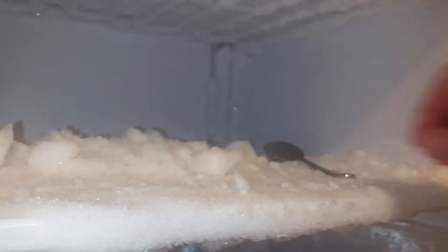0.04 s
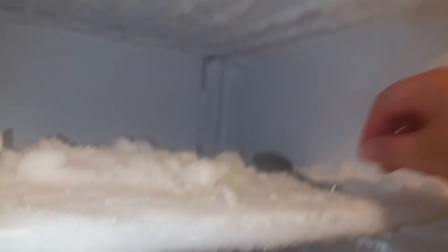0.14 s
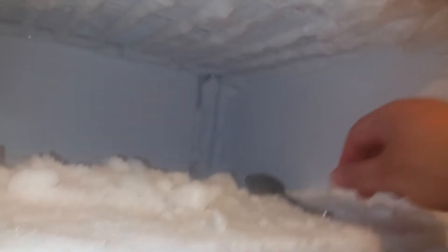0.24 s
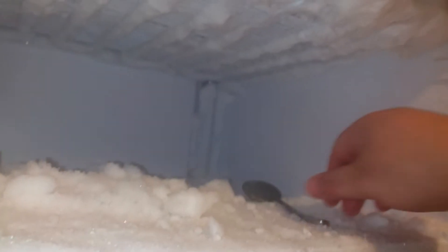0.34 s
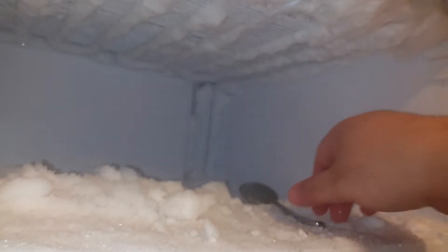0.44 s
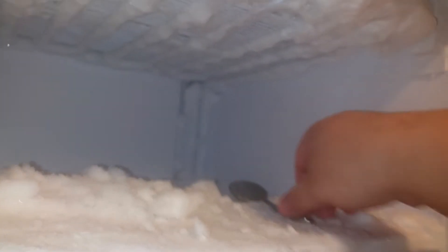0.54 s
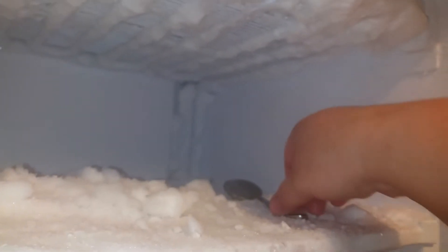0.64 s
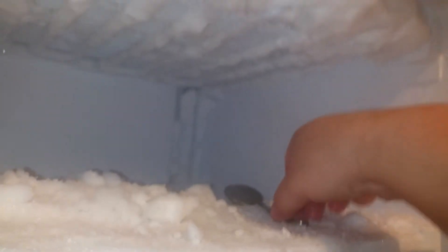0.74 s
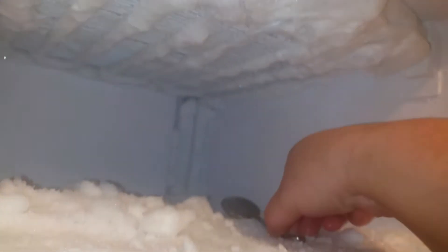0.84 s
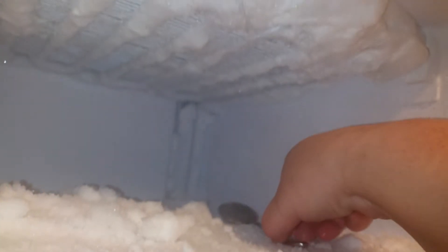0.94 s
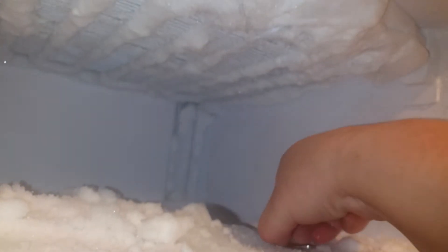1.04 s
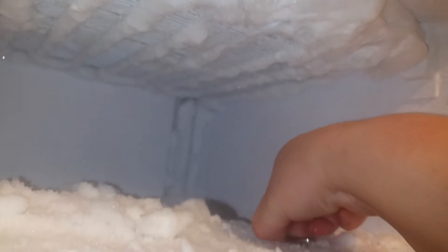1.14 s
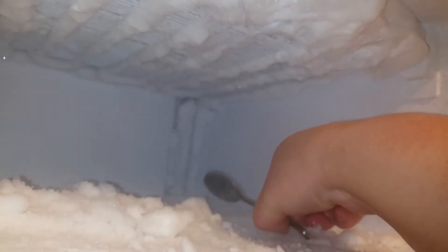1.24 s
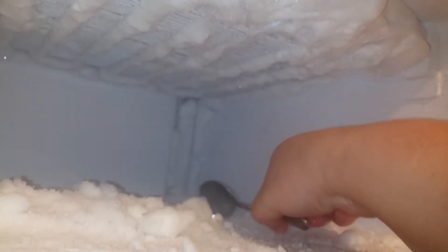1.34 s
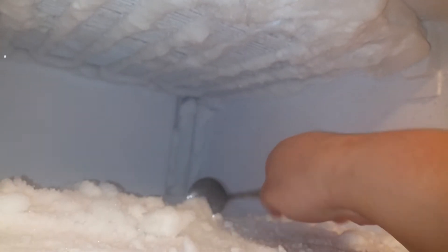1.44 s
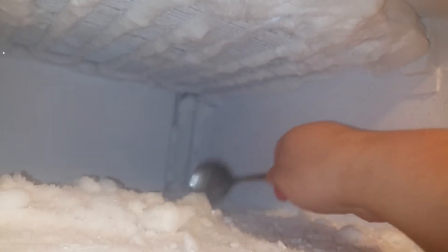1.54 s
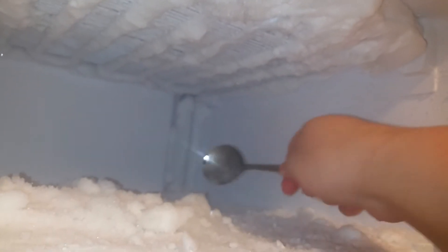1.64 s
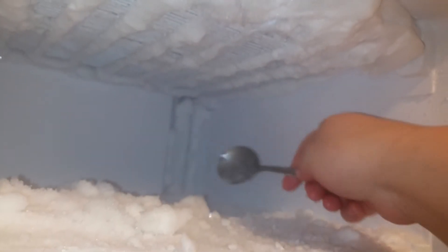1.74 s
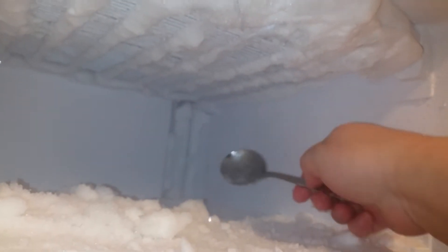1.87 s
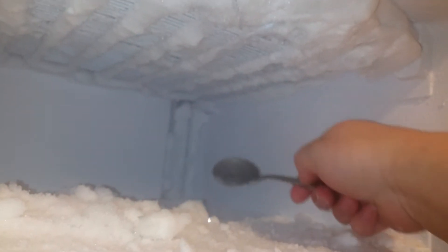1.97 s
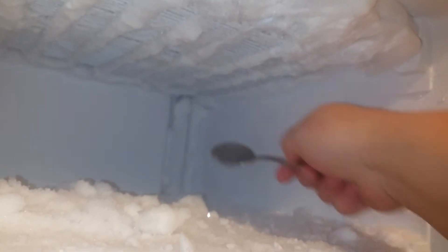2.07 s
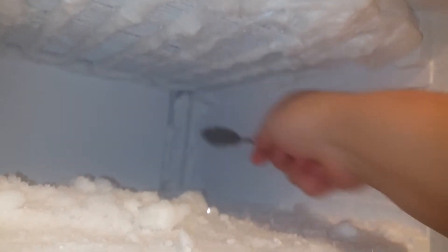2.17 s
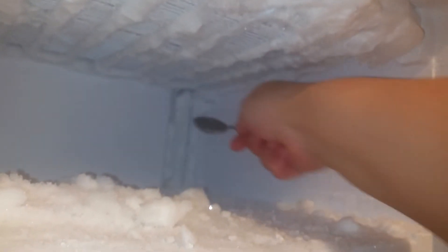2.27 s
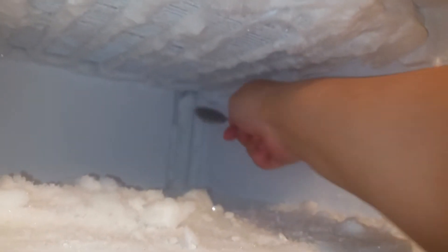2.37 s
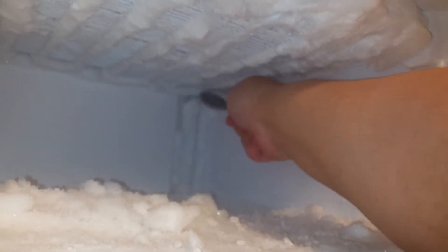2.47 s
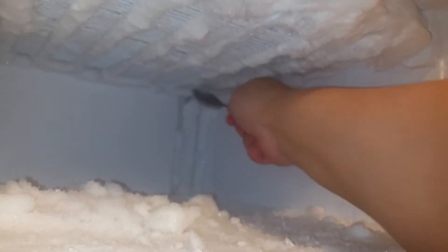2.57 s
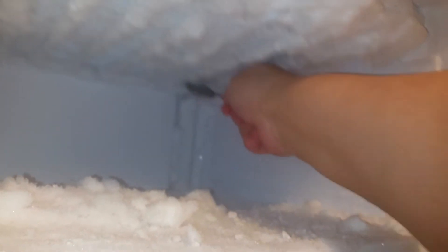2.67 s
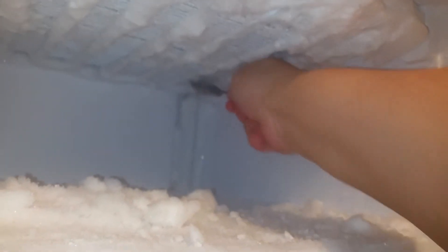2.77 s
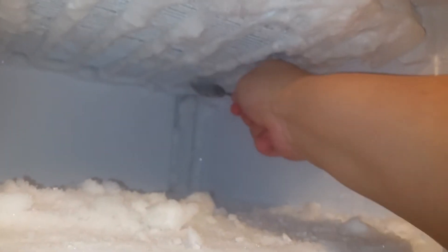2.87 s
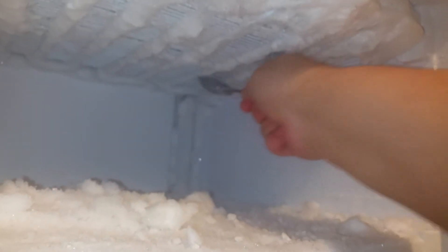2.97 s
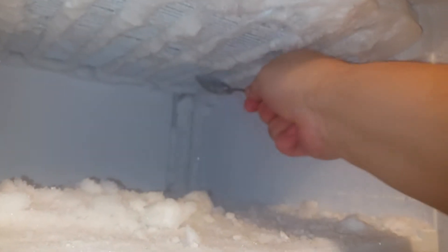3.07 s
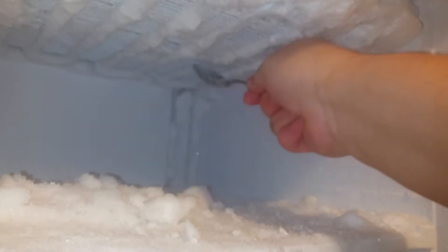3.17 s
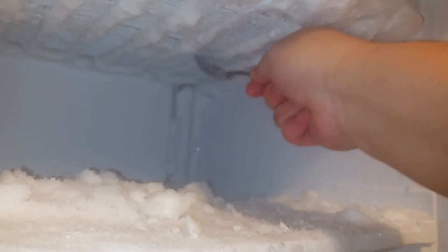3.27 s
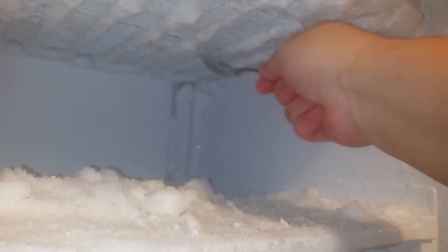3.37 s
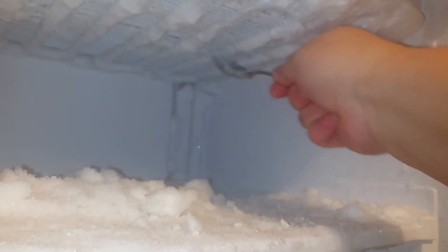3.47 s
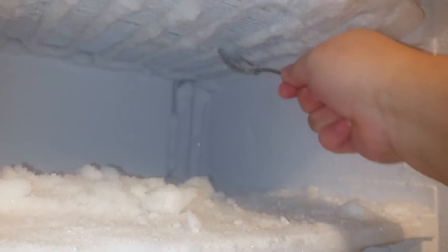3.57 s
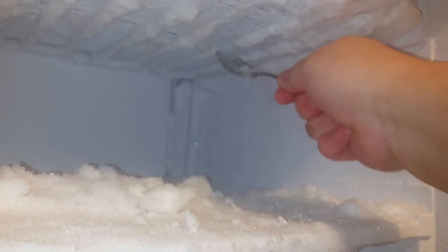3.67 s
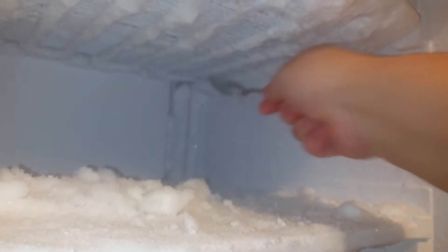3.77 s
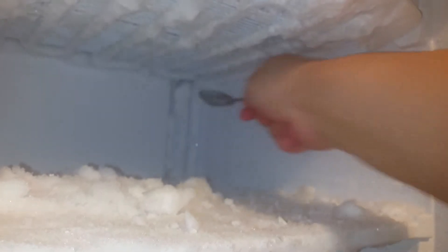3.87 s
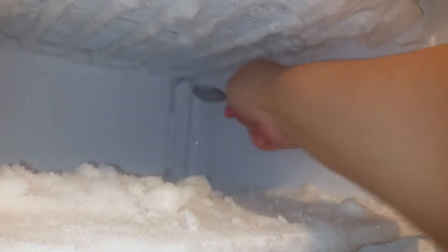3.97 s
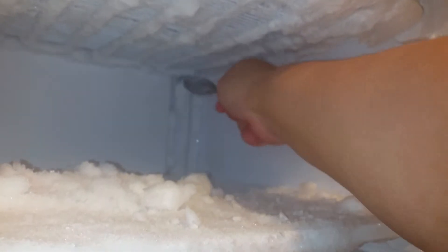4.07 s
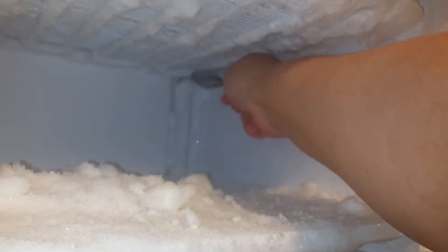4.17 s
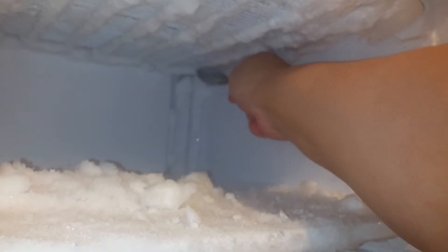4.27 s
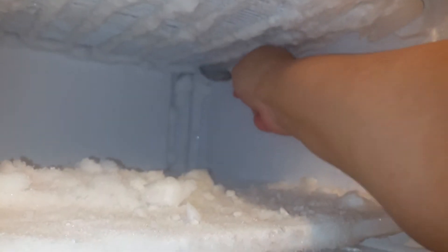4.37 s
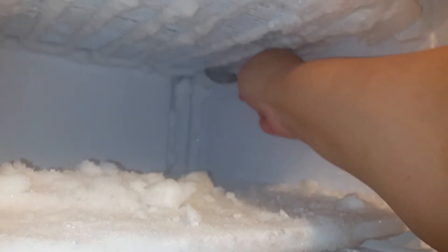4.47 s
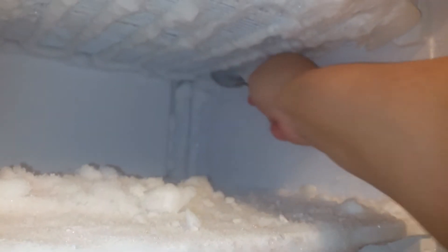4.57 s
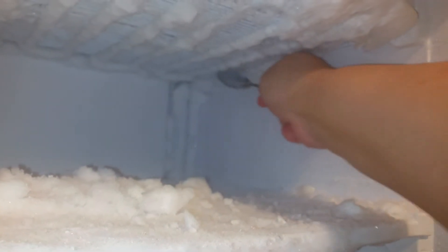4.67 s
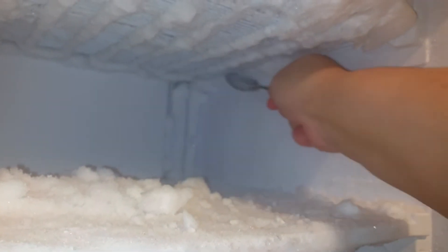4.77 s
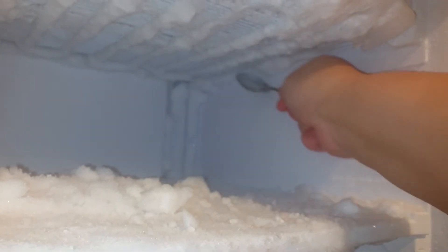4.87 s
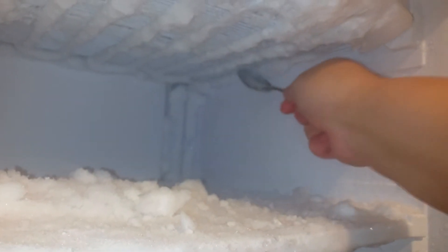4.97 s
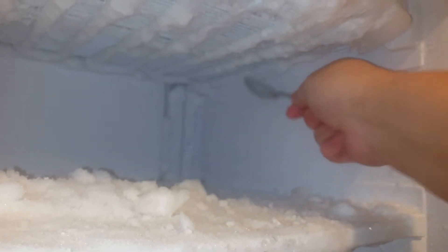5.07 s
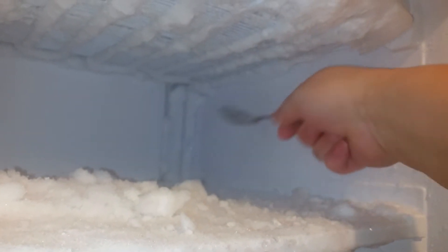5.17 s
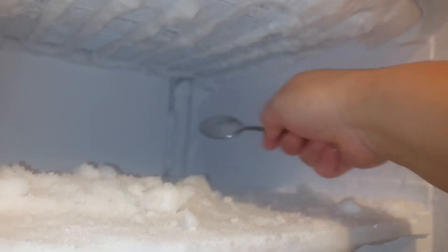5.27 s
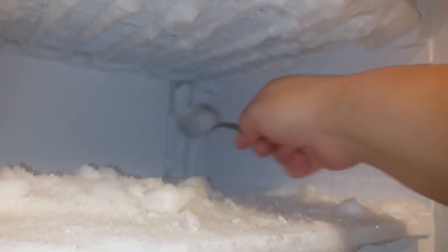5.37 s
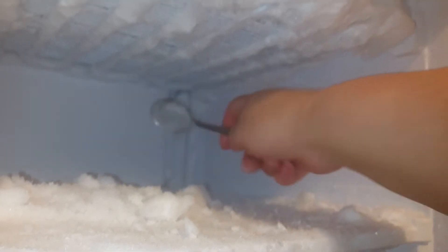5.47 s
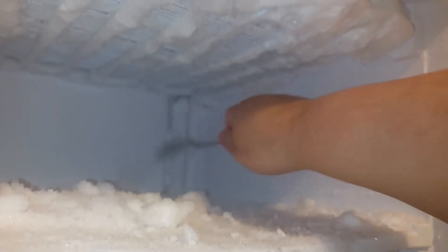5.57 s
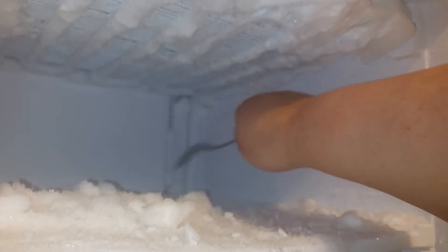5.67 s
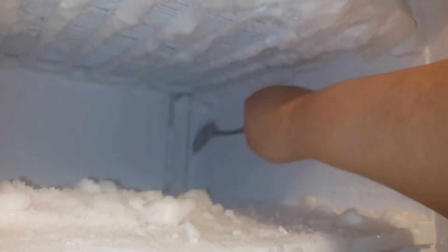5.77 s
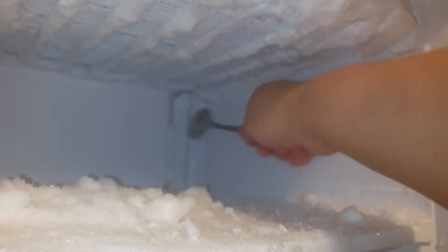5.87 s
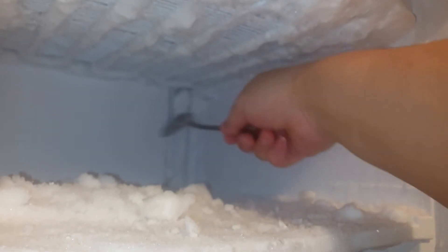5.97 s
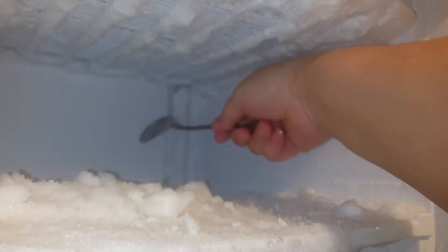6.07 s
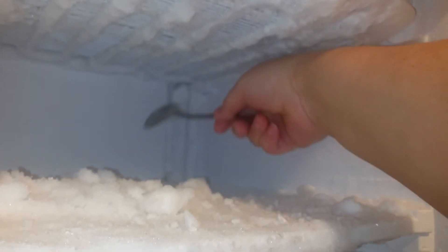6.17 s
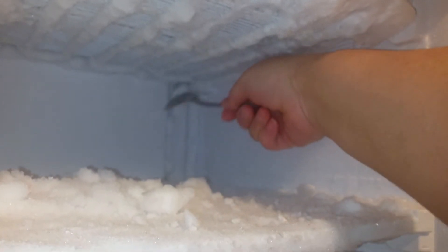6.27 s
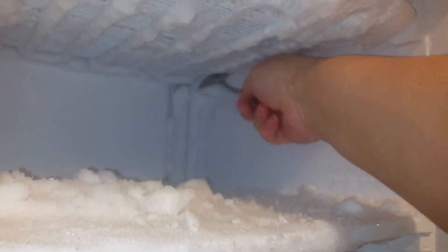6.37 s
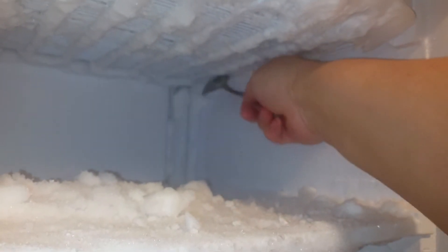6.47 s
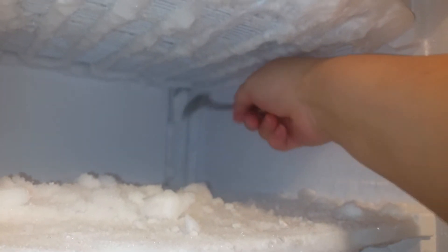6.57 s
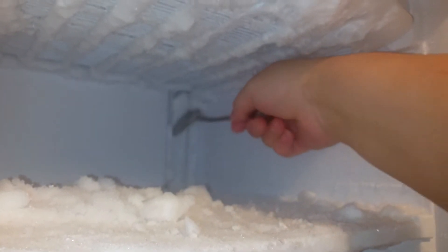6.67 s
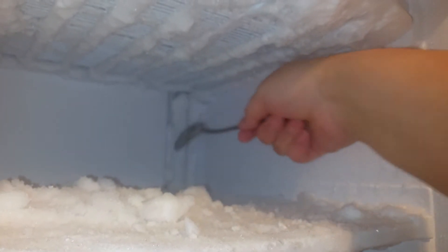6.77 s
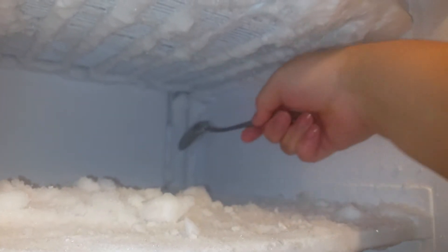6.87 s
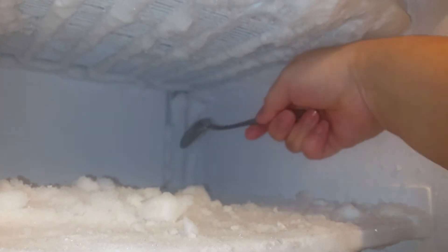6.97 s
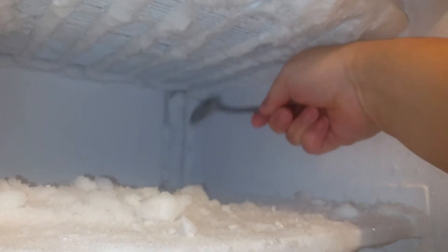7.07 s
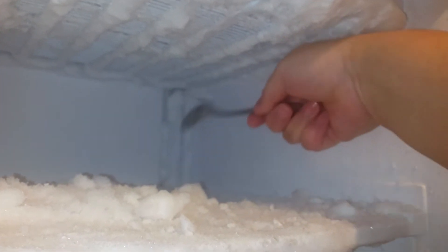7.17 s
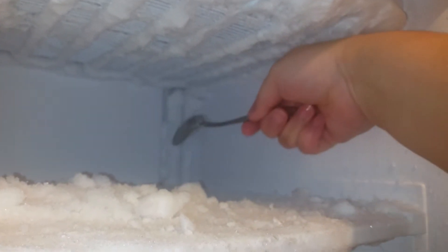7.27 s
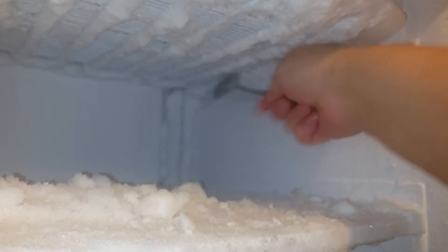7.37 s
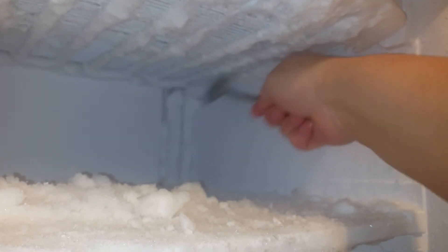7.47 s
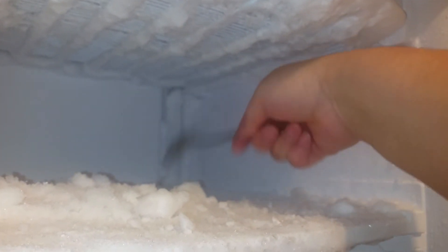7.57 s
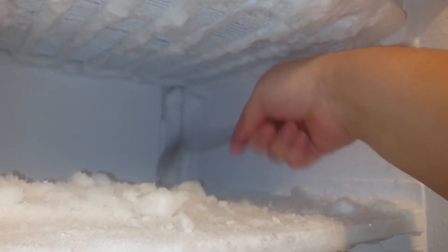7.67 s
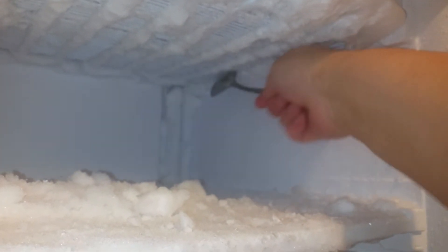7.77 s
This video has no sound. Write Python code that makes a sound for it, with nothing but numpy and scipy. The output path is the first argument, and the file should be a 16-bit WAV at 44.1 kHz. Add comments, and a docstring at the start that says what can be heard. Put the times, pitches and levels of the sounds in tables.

```python
"""Steel spoon in an icy freezer box

A steel spoon is lifted from the frost, dragged twice along the icy ceiling and tapped on the wall.
Noisy pushes make the box boom at its modes (its own notes), while bursts of treble noise are breaking crystals.
Short tones and ticks add knocks and rings; at first a finger bumps the left microphone port of the camera.
Behind it all, sines hum for the compressor and filtered noise rumbles and hisses, the coolant on the right.
"""
import sys
import numpy as np
from scipy import signal
from scipy.fft import rfft, irfft, next_fast_len
from scipy.io import wavfile
from scipy.ndimage import uniform_filter1d, minimum_filter1d, map_coordinates

SR = 44100
rng = np.random.default_rng(int(sys.argv[2]) if len(sys.argv) > 2 else 0)


def persist_wave(psi):
    """Save psi, clipped to +-1, as 16-bit WAV."""
    counts = np.round(np.clip(psi, -1, 1) * 32767).astype(np.int16)
    wavfile.write(sys.argv[1], SR, np.atleast_2d(counts).T)


N = 344862
T = np.arange(N) / SR  # time of each sample in seconds
SIDES = np.array([[.5], [-.5]])  # shares a left-minus-right value between the two channels

# The spoon dragged on the frost, one list for each stroke: lifting it free, then two drags.
# Each row: time in seconds, force in dB, edge in dB (before a common 2 dB cut), breaking crystals in dB.
STROKES = [
    [(0.66, -36, -10, -86), (0.76, -19.5, -9, -74), (0.83, -16, -10, -64), (0.95, -37, -13, -87),
     (0.995, -34, -5, -78), (1.005, -24.5, -3, -60), (1.08, -14.5, -9, -58), (1.16, -33.5, -1, -61.5),
     (1.21, -34.5, 2.5, -74), (1.3, -14.5, -3.5, -46), (1.34, -57, -32, -61.5), (1.41, -42, -16, -66.5)],
    [(2.57, -21, -32, -77), (2.62, -8.5, 0, -54), (2.69, -2.5, 1, -29.5), (2.9, 7, -1, -18.5),
     (3.05, 2, -0.5, -21.5), (3.3, 0, -2.5, -32), (3.46, -2.5, 3.5, -28.5), (3.58, -2, 6, -28),
     (3.66, -0.5, 6, -24), (3.73, -7.5, -2, -40.5), (3.8, -21.5, -3, -62.5), (3.98, -48, -2, -73.5),
     (4.1, -23.5, 0, -84.5), (4.23, -20.5, -2.5, -59)],
    [(4.27, -23, -9.5, -45.5), (4.335, -6.5, -1, -45), (4.42, -2, 1, -33.5), (4.5, -2.5, 1.5, -32.5),
     (4.58, 0, -2.5, -29.5), (4.66, -1, 1, -30.5), (4.74, -2, 2, -31.5), (4.8, -9.5, 3.5, -36),
     (4.89, -11.5, 6, -41), (4.94, -11.5, 7, -35), (5.0, -9, 8.5, -34.5), (5.06, -7, 6, -33.5),
     (5.13, -17.5, -4.5, -54), (5.2, -36.5, -12, -68.5), (5.3, -31, 3, -65)],
]
# How hard the hand leans on the spoon. Each row: time in seconds, extra force on the lowest mode in dB.
WEIGHT = [(0.7, 12), (1.4, 7), (2.6, 6), (2.8, 7), (3.4, -2.5), (3.66, 8), (4.2, 14), (4.45, -6),
          (4.75, -1.5), (5.1, 3.5)]
WEIGHT_SWAY_DB, WEIGHT_SWAY_HZ = -0.5, 35
# Crunches where the edge breaks through a crust. Each row: time in seconds, extra level in dB.
CRUNCHES = [(2.661, 17), (2.723, 8.5), (2.831, 3), (2.94, -1.5), (3.009, 12.5), (3.072, 13), (3.245, 5),
            (3.306, 7.5), (3.385, 7.5), (3.497, 6.5), (3.566, 6.5), (3.606, 14), (4.337, 11.5), (4.47, 7.5),
            (4.545, 0), (4.621, 2), (4.736, 3), (4.805, 6.5), (4.826, 5), (4.912, 7.5), (4.991, 11.5),
            (5.031, 2), (5.055, 3)]
CRUNCH_S = 0.02  # fading time constant of a crunch
CRUNCH_PUSH = 0.92  # share of the slip dB that reaches the walls
SLIPS_PER_S, SLIP_DB, SLIP_S = 90, 0.5, 0.0075  # small stick-slip releases: rate, mean jump, fading time constant
CHIPS_PER_S, CHIP_SPREAD_DB, CHIP_SHARE = 800, 3.5, 1.1  # separate chips of ice within the drag
# Notes favoured by the ice under each stroke.
# Each row: note in Hz, width in Hz, then its gain in dB in the first, second and third stroke.
PATCH = [(745, 64, -8, -11, -5.5), (1085, 150, -2, -5, -5.5), (1353, 79, -2, -1.5, -15),
         (1513, 90, -6, -13.5, -4), (1932, 130, -16, -2, -4.5), (2520, 55, -12, 0.5, -14)]
PATCH_SWAY_DB, PATCH_SWAY_HZ = 3.5, 30  # each note comes and goes as the edge moves on

# Spoon knocks. Each row: start in seconds, force in dB, weight in dB, edge in dB, crack in dB,
# crunch fading time in seconds, directly heard thud in dB against the force, fall of its pitch from 0 to 1,
# thud note in Hz, low ring note in Hz, high ring note in Hz.
TAPS = [(1.418, -9, 13, 4, -18, 0.024, -23, 0, 388, 1100, 3540),
        (1.485, -16, 8, 0, -37, 0.056, -26, 0, 424, 1090, 3450),
        (1.519, -21, 17.5, 14.5, -40, 0.04, -26, 0.2, 376, 1100, 3500),
        (2.55, -4.5, -27, -12, -35, 0.034, -12.5, 0.32, 227.4, 1060, 3550),
        (2.622, -8.5, -6.5, -4, -34, 0.044, -16, 0.04, 238, 1100, 3470),
        (2.782, 2, 11.5, -12, -26, 0.041, -28, 0.1, 151.4, 1105, 3440),
        (4.245, -6, -27.5, 2, -33, 0.12, -16, 0.34, 227, 1060, 3520),
        (6.478, -2.5, -7, 0, -17.5, 0.047, -13.5, 0.01, 561, 1827, 4590),
        (6.819, -29.5, 0.5, -15, -57, 0.025, -28, 0.1, 340, 1100, 3500),
        (7.144, -41.5, 15, 5.5, -44, 0.03, -24, 0.2, 310, 1740, 2700),
        (7.479, -3.5, 9, 8.5, -19.5, 0.06, -22.5, 0.06, 696, 1010, 4610),
        (7.679, -40.5, 28, -6, -58, 0.019, -21, 0.07, 154, 1110, 3520)]
THUD, THUD_T60 = 0.34, 0.094  # the struck wall rings on: size within the push, seconds to fade by 60 dB
KNOCK_T60, FALL_S = 0.12, .02  # directly heard thud: seconds to fade by 60 dB, seconds to settle in pitch
# Broad colour of a crack. Each row: centre in Hz, width in Hz, level in dB.
ICE = [(2680, 130, -2.5), (3170, 200, 0)]
# Colour of the crack at the low and high note of the struck spot: levels in dB, then widths in Hz.
RING_DB = (-5, -5.5)
RING_WIDTH_HZ = (110, 220)
# Clean ring of the same two notes: levels in dB against the crack, then seconds to fade by 60 dB.
NOTE_DB = (-10.5, -10)
NOTE_T60 = (0.032, 0.037)

# Strong modes of the box. Each row: note in Hz, width in Hz, level in dB, left-minus-right level in dB.
BOX = [(86.2, 19.6, -7.5, 0.5), (110.9, 5.8, 0.5, -1.5), (188.9, 6.4, -3.5, -2), (238.1, 5.7, -1.5, -4.5),
       (274.8, 12.9, -8, -2), (313.8, 15.4, -9, 0.5), (356.8, 24.3, -6.5, -5), (389.4, 13.3, -8, 0),
       (416.6, 8.1, -6, 1), (485.2, 15.3, -9.5, -2), (550, 7.9, -25, -14), (588, 14, -13.5, -7),
       (645, 5.7, -33, -3), (731.5, 9.1, -16.5, -1), (805, 25, -23.5, 19.5), (922, 28, -25.5, 19.5),
       (1027, 29.6, -19.5, 15), (1103, 23, -15, 4), (1186, 25, -19.5, 11.5), (1234, 40, -21, 14),
       (1342, 41, -16, -0.5), (1349, 36, -16, 11.5), (1406, 57, -21, 16.5), (1530, 61, -19.5, 10.5),
       (1764, 100, -22, 1.5), (1835, 27, -19.5, 14.5), (1987, 58, -21, 12)]
# Dense weak modes. Each row: frequency in Hz, level in dB.
BOX_WASH = [(40, -32), (80, -23), (150, -16.5), (450, -15.5), (680, -31), (1000, -31.5), (2000, -26.5),
            (2500, -40), (5000, -55)]
# Their fading. Each row: frequency in Hz, seconds to fade by 60 dB.
BOX_DECAY = [(100, 0.32), (500, 0.31), (2000, 0.14), (12000, 0.079)]
# Their likeness in both ears. Each row: frequency in Hz, left-right likeness from 0 to 1.
WASH_ALIKE = [(60, .6), (150, .9), (350, .95), (900, .2)]
BOX_LAG, EDGE_LAG = .00015, .00049  # seconds by which the left port hears the walls and the spoon's edge later

# Colour of fine crackle, with the port's treble peak. Each row: frequency in Hz, level in dB.
CRYSTAL = [(1500, -10.5), (2500, -10.5), (4200, -6.5), (6000, -20.5), (7000, -13.5), (9000, -30.5),
           (10500, -9.5), (11800, 6), (13500, -6.5), (16000, -4.5)]
# Colour of coarser crystals. Each row: frequency in Hz, level in dB.
CRYSTAL_WIDE = [(1500, -7), (2500, -13.5), (4200, -9), (6000, -17.5), (7000, -13.5), (9000, -23),
                (10500, -4), (11800, 3.5), (13500, -1.5), (16000, -0.5)]
# Place of the crackle. Each row: frequency in Hz, left-minus-right level in dB.
CRYSTAL_PAN = [(1500, 4.5), (2500, 6.5), (4400, 3), (6500, 9), (9000, -9), (12000, -7.5), (15500, 1)]
# Mix of crystals. Each row: time in seconds, share of coarse crystals from 0 to 1.
COARSE = [(0, 0), (2.7, 0.6), (3.1, 1), (3.25, 0), (3.7, .1), (4.4, 0.5), (4.75, 0.5), (5.1, 0.1),
          (7.8, .4)]
# Faint treble crackle. Each row: time in seconds, level in dB.
TREBLE = [(0, -84), (1.4, -65.5), (1.9, -72.5), (2.3, -88), (3.8, -69.5), (5.3, -70), (6.2, -85),
          (6.6, -67.5), (7.0, -86.5), (7.82, -81)]
# Light brushes against the frost. Each row: start in seconds, length in seconds, level in dB.
BRUSHES = [(0.114, 0.22, -73), (0.55, 0.2, -59.5), (1.913, 0.092, -62.5), (2.42, .14, -68),
           (6.278, 0.036, -47), (6.631, .16, -66.5), (6.408, 0.045, -63), (7.206, 0.05, -72.5)]
BURST_DB, BURST_HZ = 0.95, 71.6  # crystals break in bursts
SHOWER_DB, SHOWER_T60 = -45, 0.36  # crystals falling after a knock: dB against its force, seconds to fade by 60 dB
# Treble answer of the frosted walls. Each row: frequency in Hz, seconds to fade by 60 dB.
ECHO_DECAY = [(1000, 0.3), (4000, 0.059), (12000, 0.011)]
ECHO_DB = -3

# Single cracks in the frost.
# Each row: start in seconds, level in dB, low end in dB against it, seconds to fade by 60 dB.
SNAPS = [(0.5708, -45, -17, 0.015), (0.608, -46, -12, 0.015), (0.653, -49, -14, 0.015),
         (0.6993, -49, -15, 0.015), (1.0026, -40.5, -18, 0.016), (1.2332, -27.5, -29, 0.011),
         (1.3369, -41, -16, 0.019), (1.3693, -42, -14, 0.013), (1.403, -37, -7, 0.015),
         (1.417, -29.5, -24, 0.015), (1.542, -43.5, -14, 0.018), (1.6067, -56, -14, 0.015),
         (1.9425, -59, -14, 0.015), (2.55, -40, -11, 0.015), (2.6155, -45.5, -15, 0.015),
         (2.653, -30, -6, 0.015), (2.7127, -23, -14, 0.015), (2.812, -14.5, -14, 0.015),
         (2.8409, -16, -12, 0.015), (2.9597, -16.5, -13, 0.017), (3.0112, -5.5, -13.5, 0.015),
         (3.0594, -8.5, -13.5, 0.016), (3.0725, -14.5, -12.5, 0.02), (3.1006, -11, -12.5, 0.023),
         (3.274, -25.5, -16, 0.015), (3.303, -18.5, -11, 0.015), (3.3687, -15, -15.5, 0.02),
         (3.384, -17.5, -14.5, 0.01), (3.495, -22.5, -18, 0.015), (3.5418, -22.5, -17, 0.015),
         (3.64, -10, -13, 0.015), (3.9858, -46.5, -13, 0.017), (4.2448, -44.5, -14, 0.015),
         (4.312, -45, -19, 0.015), (4.3261, -38, -14, 0.015), (4.776, -18, -13, 0.015),
         (4.806, -18.5, -13, 0.015), (4.851, -31.5, -11, 0.015), (4.9227, -38.5, -14, 0.017),
         (5.0295, -30.5, -23, 0.015), (5.0582, -22.5, -24, 0.015), (5.2175, -37.5, -13, 0.015),
         (5.3, -35.5, 1, 0.014), (6.4098, -46.5, -2, 0.015), (6.4254, -51, -12, 0.015),
         (6.4766, -18.5, -15, 0.016), (6.5929, -47, -12, 0.015), (7.1561, -60, -14, 0.015),
         (7.2066, -53, -14.5, 0.015), (7.226, -42.5, -18, 0.015), (7.4762, -26.5, -11, 0.024)]
SNAP_RISE_S = .0004
# Colour of a crack's bright tick. Each row: frequency in Hz, level in dB.
SNAP_TOP = [(7500, -30), (9500, -12), (11000, 0), (12500, 0), (16000, -3)]
# Colour of its low end. Each row: frequency in Hz, level in dB.
SNAP_LOW = [(1200, -25), (2000, 0), (5000, -2), (7000, -10), (9000, -30)]
# Rings of the spoon. Each row: start in seconds, level in dB.
CLINKS = [(1.1488, -51.5), (1.26, -43.5), (1.278, -45.5), (1.289, -37), (1.3, -45), (1.414, -36.5),
          (1.483, -36.5), (1.515, -49), (6.4772, -49)]
# Notes of the spoon. Each row: note in Hz, level in dB, seconds to fade by 60 dB.
SPOON = [(6700, -17, .07), (11300, -2, .06), (12350, 0, .08), (15100, -12, .05)]
# Short low notes: the camera body ringing at the left bump, then a low creak of skin or frost.
# Each row: start in seconds, length in seconds, first Hz, last Hz, level in dB, left-minus-right level in dB.
LOW_NOTES = [(.575, .125, 268, 256, -33, -14), (6.212, .05, 250, 172, -29, 0)]

# Small ticks of frost and skin while the hand gropes.
# Each row: start in seconds, level in dB, note in Hz, left-minus-right level in dB.
TICKS = [(0.074, -55, 748, -5), (0.099, -37, 540, -6), (0.136, -39, 511, 14), (0.149, -43, 510, 14.0),
         (0.164, -35, 500, 16), (0.192, -38, 627, 14), (0.215, -45, 573, 8.0), (0.263, -43.5, 600, 16),
         (0.296, -42, 786, 14), (0.318, -48, 530, 8.5), (0.342, -40, 580, 15), (0.37, -42, 636, 14),
         (0.57, -37, 526, -13), (0.595, -34, 501, 4), (0.64, -51, 576, -2), (0.654, -36, 501, -0.5),
         (0.724, -34, 566, -5), (0.768, -42, 544, 1.5), (0.796, -38, 501, -2), (0.82, -33.5, 501, 5),
         (0.838, -34, 654, 6), (0.872, -50, 660, 8.5), (0.892, -43, 738, 3.0), (0.911, -41, 595, 7.5),
         (0.935, -44, 525, 5.5), (0.965, -44, 676, 8.0), (0.996, -40, 627, 14), (1.017, -40, 505, 2.5),
         (1.125, -42, 500, 5.0)]
TICK_T60, TICK_EDGE_T60 = 0.019, 0.0072  # seconds for note and sharp edge to fade by 60 dB
# A finger slips on the left port. Each row: start in seconds, level in dB, tick in dB against it.
BUMPS = [(0.105, -21, -15), (0.151, -15.5, -13), (0.164, -9.5, -2), (0.173, -4.5, -14), (0.197, -19, -10),
         (0.341, -22, 5), (0.352, -11, -6), (0.372, -24, 5), (0.389, -9.5, -12), (0.572, -4.5, -4),
         (0.598, -11.5, -7), (0.611, -10.5, -11), (0.625, -11, -22), (0.659, -12, -2), (0.701, -15.5, -3),
         (0.798, -22, 6), (0.824, -19, -2), (0.837, -22.5, 13), (0.899, -28, -11), (0.964, -27, -6),
         (1.021, -27.5, 9), (1.051, -23, -2), (1.08, -37, -11)]
BUMP_HZ = 117.5  # sets the speed of the pressure swing
# Skin sliding on the camera. Each row: time in seconds, level at the left port in dB.
GRIP = [(0.0, -83), (0.13, -41), (0.25, -38.5), (0.598, -39.5), (0.958, -37.5), (1.096, -38.5), (1.2, -56)]

# Hum notes. Each row: note in Hz, average (rms) level in dB, waver in dB.
HUM = [(50, -62, 2), (99.8, -44, .8), (146.5, -57, 2.5), (300.3, -58, 2)]
# Kitchen and compressor rumble. Each row: frequency in Hz, level in dB.
AIR = [(12, -37), (22, -11), (50, -6), (80, -6), (125, -5.5), (190, -17), (310, -7), (500, -18.5),
       (700, -31), (1000, -81)]
# Likeness of the room noise in both ears. Each row: frequency in Hz, left-right likeness from 0 to 1.
AIR_ALIKE = [(25, 0.46), (60, 0.8), (130, 0.72), (290, 0.94), (640, 0.21), (1400, 0.044)]
# Colour of the sleeve and room rustle. Each row: frequency in Hz, level in dB.
RUSTLE = [(500, -31), (750, 3.5), (1000, 6), (1250, 3.5), (1500, 4), (2000, -3.5), (2600, -35)]
# Colour of the coolant hiss. Each row: frequency in Hz, level in dB.
COOLANT = [(2300, -33.5), (2800, -21.5), (3050, -2), (3600, -1), (4200, -5.5), (4700, -9), (5300, -28),
           (6000, -42), (8000, -63.5), (10000, -40.5), (11500, -29.5), (15000, -22), (16000, -36.5)]
# Place of the hiss. Each row: frequency in Hz, left-minus-right level in dB.
COOLANT_PAN = [(2000, 20), (3500, -19), (5000, -4), (7000, 2)]
# Background levels. Each row: time in seconds, rumble in dB, rustle in dB, narrow hiss in dB.
ROOM = [(0, -51, -66.5, -75), (1.65, -48.5, -62.5, -69.5), (1.9, -45, -61.5, -64),
        (2.3, -51.5, -69.5, -80.5), (4.1, -48, -64, -66), (5.3, -53.5, -68.5, -79),
        (5.55, -48, -67.5, -67.5), (5.85, -46, -61.5, -58), (6.2, -51, -68, -74.5), (6.45, -45, -60, -61),
        (6.75, -48.5, -61.5, -67), (7.1, -52.5, -71, -70.5), (7.3, -52.5, -70.5, -82.5),
        (7.82, -53.5, -66, -80.5)]
RUSTLE_SWAY_DB, RUMBLE_SWAY_DB = 1.8, 2.2
TOP_HZ = 15720  # the camera's band limit


def spoon_force(slip_db):
    """Dragging is a stream of small breaks; a tap crunches into the frost, its sharp part over first."""
    force = np.zeros(N)
    grains = grit(450, spread_db=4.5, slip_hz=70.55, slip_db=1.5)
    breaks = unit(shifting(grains + CHIP_SHARE * chips(), depth_db=1.5))
    weight_db = curves(WEIGHT, outside=None)[0] + WEIGHT_SWAY_DB * wobble(WEIGHT_SWAY_HZ)
    for stroke, rows in enumerate(STROKES):
        db, edge_db, _ = curves(rows)
        push = amp(db + CRUNCH_PUSH * slip_db) * patch(breaks, stroke)
        force += tilted(push, weight_db, edge_db - 2.0)
    t = T[:SR // 3]
    for s, db, lean_db, edge_db, _, crunch_s, _, _, thud_hz, *_ in TAPS:
        push = unit(rng.standard_normal(len(t))) * np.exp(-t / crunch_s) * (1 - np.exp(-t / 0.0012))
        push += 5 * np.sin(np.pi * np.clip(t / 0.0006, 0, 1))  # the blow itself
        push += 0.74 * np.sin(np.pi * np.clip(t * thud_hz * 2, 0, 1))  # the wall giving way under it
        push += 0.4 * band(push, "band", [thud_hz / 1.26, thud_hz * 1.5])  # each spot has its own give
        push += THUD * amp(-60 * t / THUD_T60) * np.sin(2 * np.pi * thud_hz * t)
        add(force, s, amp(db) * tilted(push, lean_db - 6 * np.exp(-t / 0.02), edge_db - 600 * t))
    return force


def slips():
    """Gain in dB: the edge sticks, lets go at once and fades; force and crystals follow it together."""
    small, big, t = np.zeros(N), np.zeros(N), T[:SR // 5]
    draw = rng.random(size=(int(SLIPS_PER_S * N / SR), 2))
    small[(draw[:, 0] * N).astype(int)] = SLIP_DB * (.5 + draw[:, 1])
    for s, db in CRUNCHES:
        big[round(s * SR)] = db
    small_db = signal.fftconvolve(small, np.exp(-t / SLIP_S))[:N]
    big_db = signal.fftconvolve(big, np.exp(-t / CRUNCH_S))[:N]
    return small_db + big_db - SLIPS_PER_S * SLIP_DB * SLIP_S - 2.5  # takes off the mean small slip, then 2.5 dB


def grit(grain_hz, spread_db, slip_hz, slip_db):
    """Noise broken into grains of uneven size that come in clumps as the edge sticks and slips."""
    level_db = spread_db * wobble(grain_hz) + slip_db * wobble(slip_hz)
    return unit(rng.standard_normal(N) * amp(level_db))


def chips():
    """Single sharp pushes of ice at random moments, a few much larger than the rest."""
    out = np.zeros(N)
    draw = rng.random(size=(int(CHIPS_PER_S * N / SR), 2))
    out[(draw[:, 0] * N).astype(int)] = amp(-CHIP_SPREAD_DB * np.log(draw[:, 1] + 0.00092))
    return unit(out - out.mean())


def shifting(x, depth_db):
    """The moving contact point favours now these upper modes, now those."""
    hz, _, z = signal.stft(x, SR, nperseg=1024)
    field = uniform_filter1d(rng.standard_normal(z.shape), size=4, axis=0)
    field = uniform_filter1d(field, size=10, axis=1)
    change = amp(depth_db * unit(field) * (hz[:, None] > 500))
    return signal.istft(z * change, nperseg=1024)[1][:N]


def patch(x, stroke):
    """The ice under one stroke adds its notes to the breaks."""
    out = x.copy()
    for hz, width, *gains in PATCH:
        gain = amp(gains[stroke] + PATCH_SWAY_DB * wobble(PATCH_SWAY_HZ))
        out += gain * band(x, "band", [hz - width / 2, hz + width / 2])
    return out


def tilted(force, weight_db, edge_db):
    """Weight of the hand feeds the lowest mode, the sharp edge the upper ones."""
    low = band(force, "band", [50, 140])
    middle = band(force, "band", [140, 750])
    high = band(force, "high", 750)
    return middle - amp(weight_db) * low - amp(edge_db) * high  # the signs keep the parts in phase


def box(force):
    """The walls and air of the box answer a force; modes above 1150 Hz reach the ports in opposite phase."""
    def modes(f):
        total = 0
        for k, (hz, width, db, pan) in enumerate(BOX):
            sign = (-1) ** k
            signs = np.array([[sign], [sign * np.sign(1150 - hz)]])
            total = total + amp(db + SIDES * pan) * signs * resonance(f, hz, width)
        return total

    def alike(f):
        return along(WASH_ALIKE, f)

    wash, step = np.zeros((2, N)), SR // 8
    # a fresh noise tail each eighth of a second, so no chance peaks stand out in the wash
    for start in range(0, N, step):
        piece = force[None, start:start + step]
        add(wash, start / SR, signal.fftconvolve(piece, tail(BOX_DECAY, .35), axes=1))
    wash[1] = filtered(wash[0], alike) + filtered(wash[1], lambda f: np.sqrt(1 - alike(f) ** 2))
    wash = filtered(wash, lambda f: amp(along(BOX_WASH, f)))
    return later_left(filtered(force, modes) + wash, BOX_LAG)


def cracks():
    """The hard first instant of each tap, heard through the air: coloured noise, a thud and two ring notes."""
    out, t = np.zeros((2, N)), T[:SR // 6]
    f = np.fft.rfftfreq(len(t), 1 / SR)
    for s, force_db, _, _, crack_db, _, knock_db, fall, thud_hz, *ring_hz in TAPS:
        burst = amp(crack_db - 60 * t / 0.024) * rng.standard_normal((2, len(t)))
        peaks = list(ICE) + list(zip(ring_hz, RING_WIDTH_HZ, RING_DB))
        colour = sum(amp(db) * resonance(f, hz, width) for hz, width, db in peaks)
        add(out, s, irfft(rfft(burst) * colour, len(t)))

        falling = t + fall * FALL_S * (1 - np.exp(-t / FALL_S))  # time runs faster at first: higher pitch
        thud = amp(force_db + knock_db - 60 * t / KNOCK_T60) * np.sin(2 * np.pi * thud_hz * falling)
        add(out, s, thud * (1 - np.exp(-t / .002)))

        notes = zip(ring_hz, np.add(crack_db, NOTE_DB), NOTE_T60)
        ring = sum(amp(db - 60 * t / t60) * np.sin(2 * np.pi * hz * t) for hz, db, t60 in notes)
        add(out, s, ring * (1 - np.exp(-t / 0.00088)))
    return out


def crackle(slip_db):
    """Crystals break under the edge; part of each break reaches both ports alike."""
    shared = grit(900, spread_db=4.0, slip_hz=49.8, slip_db=2.5)
    spray = amp(2.66 * wobble(45)) * rng.standard_normal((2, N))
    both = shared * 0.5 + np.abs(shared) ** 0.64 * spray
    pair = np.array([shifting(side, depth_db=4.5) for side in both])

    def coloured(colour):
        return unit(filtered(pair, lambda f: amp(along(colour, f) + SIDES * along(CRYSTAL_PAN, f))))

    share = curves(COARSE, outside=None)[0]
    return breaking(slip_db) * ((1 - share) * coloured(CRYSTAL) + share * coloured(CRYSTAL_WIDE))


def breaking(slip_db):
    """How strongly crystals break: under each stroke, at each brush and in the shower after a knock."""
    gain = amp(curves(TREBLE, outside=None)[0])
    bursts = amp(BURST_DB * wobble(BURST_HZ) + 0.56 * slip_db)
    for rows in STROKES:
        s, *_, crystal_db = np.transpose(rows)
        gain += amp(np.interp(T, s, crystal_db, -140, -140)) * bursts
    for s, length, db in BRUSHES:
        add(gain, s, amp(db) * np.sin(np.pi * T[:int(length * SR)] / length))
    for s, db, *_ in TAPS:
        add(gain, s, amp(db + SHOWER_DB - 60 * T[:SR // 2] / SHOWER_T60))
    return gain


def snaps():
    """Single cracks: a short bright noise tick with its own low end; half of it reaches both ports alike."""
    noise, t = rng.standard_normal((2, 3, N)), T[:SR // 10]
    gains = np.zeros((2, N))  # one for the top, one for the low end
    for s, db, low_db, t60 in SNAPS:
        shape = amp(db - 60 * t / t60) * (1 - np.exp(-t / SNAP_RISE_S))
        add(gains, s, amp([[0], [low_db]]) * shape)
    top, low = gains[:, None] * (noise[:, :2] + noise[:, 2:])  # own noise of each port plus a shared one
    bright = filtered(top, lambda f: amp(along(SNAP_TOP, f) + SIDES * -5))
    return bright + filtered(low, lambda f: amp(along(SNAP_LOW, f)))


def clinks():
    """The freed spoon rings briefly as fading sines, at new strengths each time."""
    out, t = np.zeros(N), T[:SR // 5]
    for s, db in CLINKS:
        for hz, level, t60 in SPOON:
            fade = amp(db + level + rng.normal(0, 2.5) - 60 * t / t60)
            blur = np.cumsum(rng.normal(0, .08, len(t)))  # a loose grip blurs the tone
            add(out, s, fade * (1 - np.exp(-t / 0.00078)) * np.sin(2 * np.pi * hz * t + blur))
    return out * amp(SIDES * -5)


def low_notes():
    """Brief low notes that fall in pitch, slightly uneven, with a weak octave."""
    out, uneven = np.zeros((2, N)), amp(2.5 * wobble(60))
    for s, length, from_hz, to_hz, db, pan_db in LOW_NOTES:
        u = T[:int(length * SR)] / length  # runs from 0 to 1
        phase = 2 * np.pi * length * (from_hz * u + (to_hz - from_hz) * u * u / 2)
        swell = np.sin(np.pi * u ** 0.31) ** 0.24
        add(out, s, amp(db + SIDES * pan_db) * swell * (np.sin(phase) + 0.13 * u * np.sin(2 * phase)))
    return out * uneven


def ticks():
    """Each tick of frost and skin is a short dull note with a sharper edge of noise."""
    out, t = np.zeros((2, N)), T[:SR // 20]
    for s, db, hz, pan_db in TICKS:
        edge = band(rng.standard_normal(len(t)), "band", [600, 2000]) * amp(2 - 60 * t / TICK_EDGE_T60)
        note = np.sin(2 * np.pi * hz * t) * amp(-60 * t / TICK_T60)
        add(out, s, amp(db + SIDES * pan_db) * (note + edge))
    return out


def handling():
    """Each finger slip is a pressure swing and a tick, and skin rubs; the right port hears it 16 dB weaker."""
    out, t = np.zeros(N), T[:SR // 6]
    u = t * BUMP_HZ
    swing = -np.sin(2 * np.pi * u ** 0.57)  # falls in pitch as the seal relaxes
    swing = swing * u ** 0.61 * np.exp(-u / 0.44) * 2.46
    for s, db, tick_db in BUMPS:
        noise = band(rng.standard_normal(len(t)), "band", [200, 1100])
        tick = band(noise, "low", 750) * amp(tick_db - 60 * t / 0.021)
        add(out, s, amp(db) * (swing + tick))
    rub_colour = [(20, -33), (80, 4.5), (300, -7.0), (700, -19), (2000, -27.5), (6000, -67.0)]  # Hz, dB
    rub = grit(119.9, spread_db=2.5, slip_hz=27.25, slip_db=2.0)
    rub = filtered(rub, lambda f: amp(along(rub_colour, f)))
    out += amp(curves(GRIP)[0]) * unit(rub)
    return out * amp([[0], [-16]])


def appliance():
    """Compressor hum from wavering sines; rumble, rustle, coolant hiss and a narrow band from noise."""
    rumble_db, rustle_db, narrow_db = curves(ROOM, outside=None)
    hum = np.zeros(N)
    for hz, db, waver in HUM:
        phase = 2 * np.pi * hz * T + 0.56 * waver * wobble(3.3)
        hum += np.sqrt(2) * amp(db + waver * wobble(10.0)) * np.sin(phase)

    def spread(spectrum):
        def middle_and_side(f):
            turn = np.arccos(along(AIR_ALIKE, f)) / 2
            return amp(along(spectrum, f)) * [np.cos(turn), np.sin(turn)]
        mid, side = filtered(rng.standard_normal((2, N)), middle_and_side)
        return unit(np.array([mid + side, mid - side]))

    def hiss_colour(f):
        return amp(along(COOLANT, f) + SIDES * along(COOLANT_PAN, f))

    def narrow_colour(f):
        return 1 / (1 + ((f - 2470) / 130) ** 2) * amp(SIDES * -3)

    rumble = amp(rumble_db + RUMBLE_SWAY_DB * wobble(6)) * spread(AIR)
    rustle = amp(rustle_db + RUSTLE_SWAY_DB * wobble(9.1)) * spread(RUSTLE)
    hiss = amp(-52 + 2.1 * wobble(4.8)) * unit(filtered(rng.standard_normal((2, N)), hiss_colour))
    narrow = amp(narrow_db) * unit(filtered(rng.standard_normal((2, N)), narrow_colour))
    return hum + rumble + rustle + hiss + narrow


def amp(db):
    """Turn dB into a plain factor."""
    return 10 ** (np.asarray(db) / 20)


def unit(x):
    """Scale to an average (rms) level of 1."""
    return x / np.sqrt(np.mean(x ** 2) + 1e-20)


def along(points, hz):
    """Read a curve of (Hz, value) points on a log frequency axis."""
    f, v = np.transpose(points)
    return np.interp(np.log(hz + 1), np.log(f + 1), v)


def curves(rows, outside=-140):
    """One value per sample for each column; the first takes a set level outside the table (None: its end values)."""
    s, db, *cols = np.transpose(rows)
    return [np.interp(T, s, db, outside, outside)] + [np.interp(T, s, c) for c in cols]


def wobble(rate):
    """A smooth random curve with this many random points a second."""
    return map_coordinates(rng.standard_normal(int(N * rate / SR) + 4), [T * rate])


def filtered(x, response):
    """Multiply the spectrum of x by a function of frequency."""
    m = next_fast_len(N + SR // 2)
    return irfft(rfft(x, m) * response(np.fft.rfftfreq(m, 1 / SR)), m)[..., :N]


def band(x, kind, hz):
    """Filter forward in time with a Butterworth design of order 2."""
    return signal.sosfilt(signal.butter(2, hz, kind, fs=SR, output="sos"), x)


def resonance(f, hz, width):
    """Frequency response of one mode: largest at its own note, broader when it is damped more."""
    return 1j * f * width / (hz * hz - f * f + 1j * f * width)


def add(track, s, piece):
    """Mix a piece in at time s."""
    part = track[..., round(s * SR):][..., :piece.shape[-1]]
    part += piece[..., :part.shape[-1]]


def tail(decay, seconds):
    """A stereo noise whose frequencies die at their own speed, scaled to energy 1 on the left."""
    hz, t, z = signal.stft(rng.standard_normal((2, int(seconds * SR))), SR, nperseg=256)
    x = signal.istft(z * amp(-60 * t / along(decay, hz)[:, None]), SR, nperseg=256)[1]
    return x / np.linalg.norm(x[0])


def later_left(x, lag):
    """Delay left against right by lag seconds."""
    return filtered(x, lambda f: np.exp(-2j * np.pi * f * SIDES * lag))


def scene():
    """Mix the answering box, the bright edge sounds and their echo, the small sounds and the background."""
    slip_db = slips()
    bright = later_left(crackle(slip_db) + snaps() + clinks(), EDGE_LAG) + cracks()
    echo = amp(ECHO_DB) * signal.fftconvolve(bright, tail(ECHO_DECAY, 0.24), axes=1)[:, :N]
    boom = box(spoon_force(slip_db))
    return boom + bright + echo + low_notes() + ticks() + handling() + appliance()


def record(dry):
    """Fast gain control holds loud peaks down; the camera keeps nothing above its band limit."""
    over = np.maximum(np.abs(dry).max(0) / 0.28, 1)
    gain = uniform_filter1d(minimum_filter1d(over ** -.6, size=441), size=221)
    return filtered(dry * gain, lambda hz: hz < TOP_HZ)


dry = scene()
out = record(dry)
persist_wave(out)
```